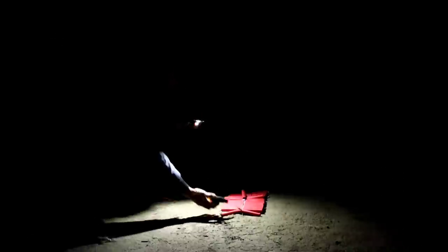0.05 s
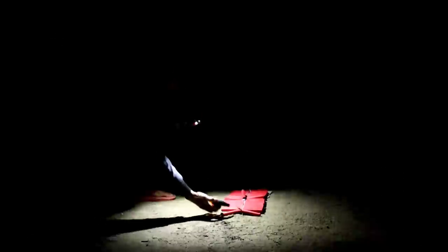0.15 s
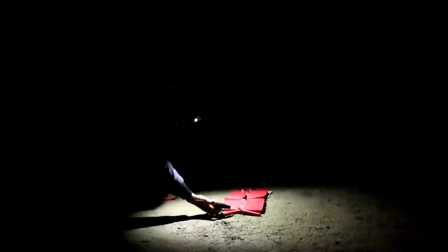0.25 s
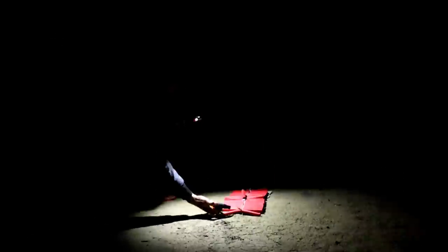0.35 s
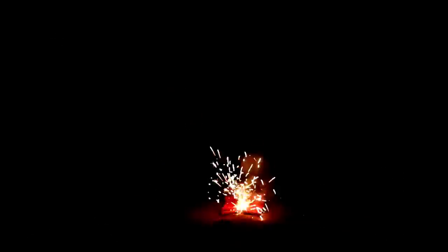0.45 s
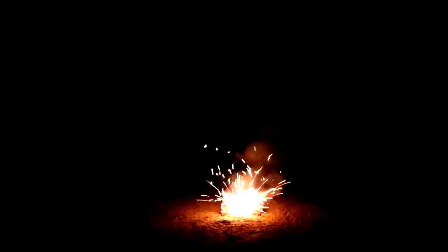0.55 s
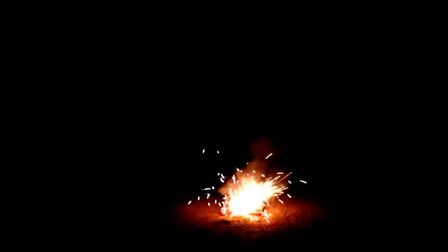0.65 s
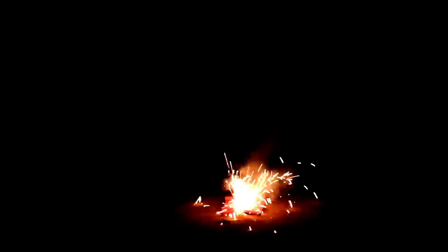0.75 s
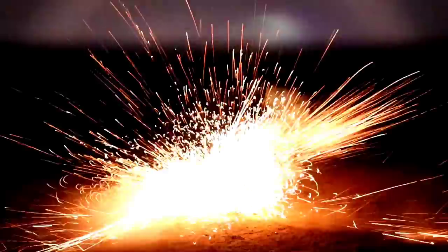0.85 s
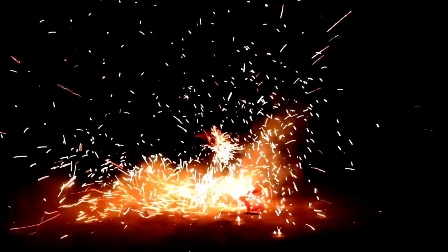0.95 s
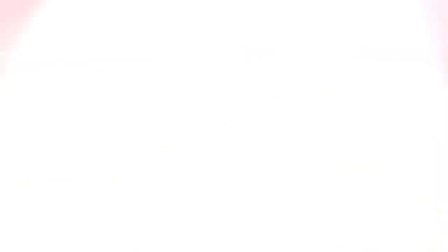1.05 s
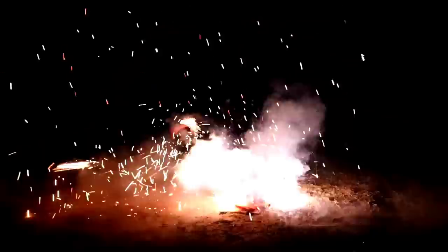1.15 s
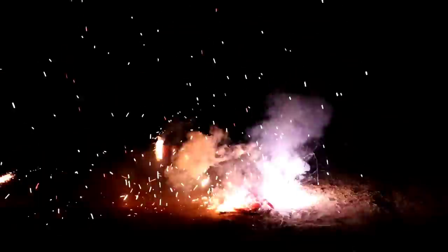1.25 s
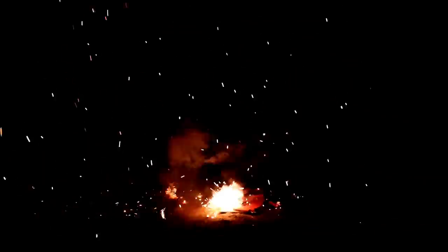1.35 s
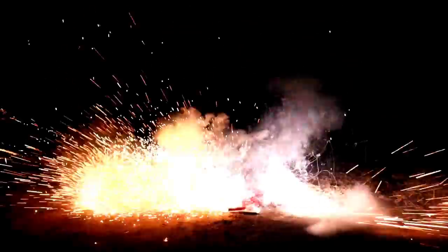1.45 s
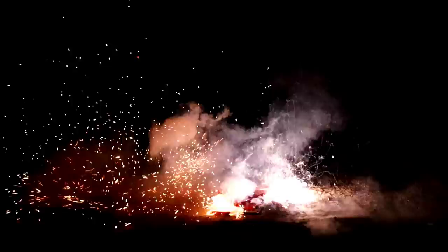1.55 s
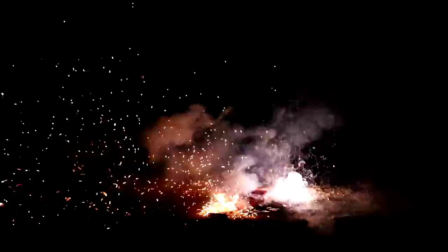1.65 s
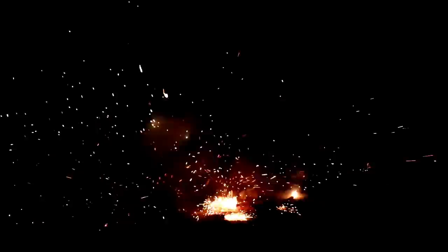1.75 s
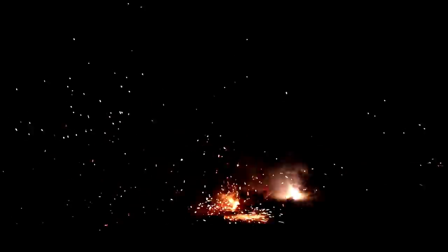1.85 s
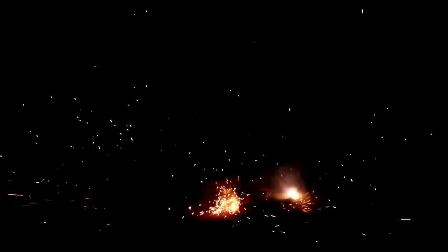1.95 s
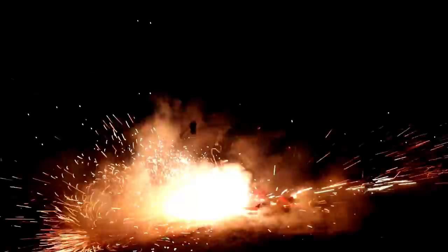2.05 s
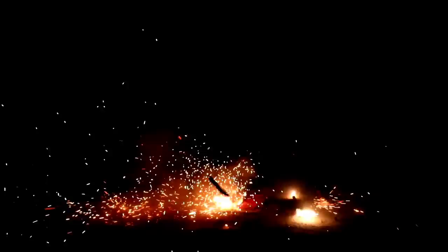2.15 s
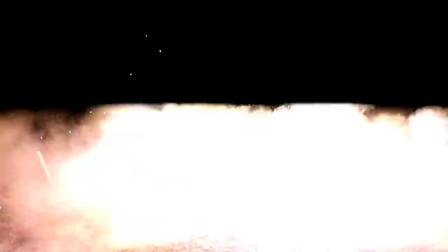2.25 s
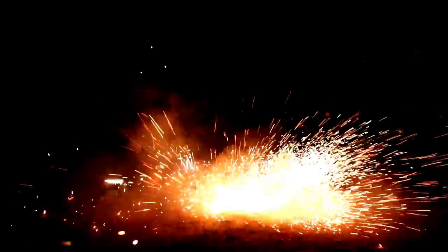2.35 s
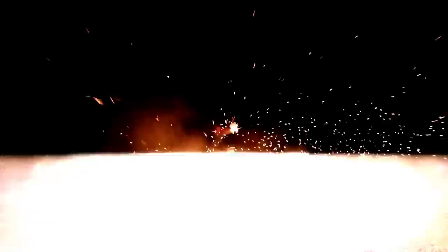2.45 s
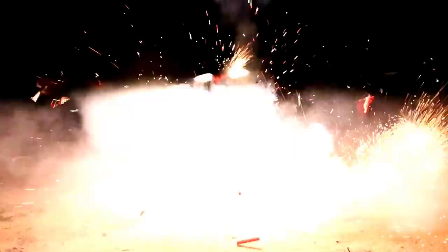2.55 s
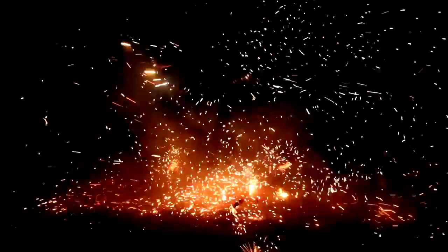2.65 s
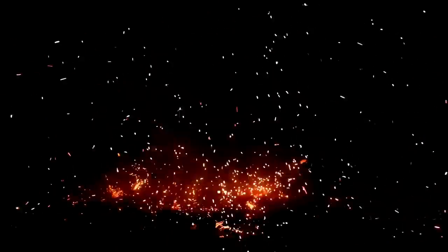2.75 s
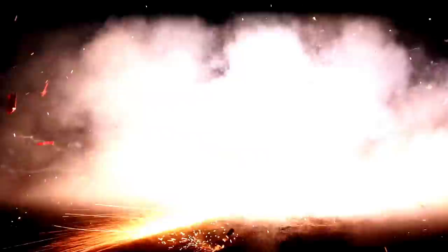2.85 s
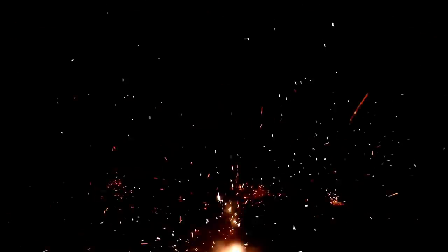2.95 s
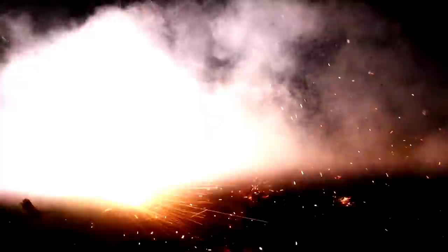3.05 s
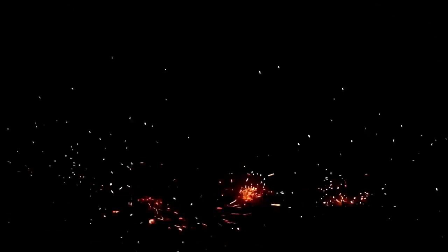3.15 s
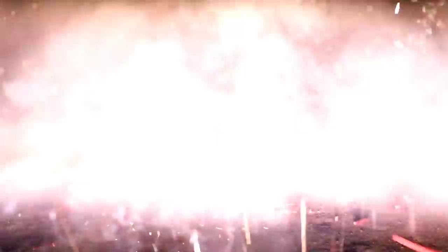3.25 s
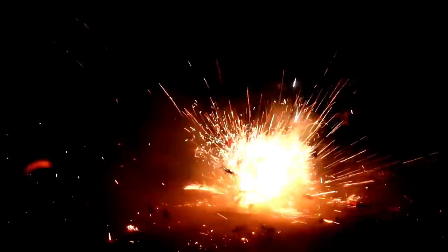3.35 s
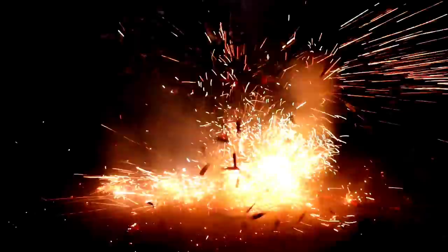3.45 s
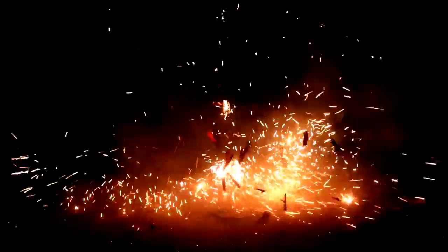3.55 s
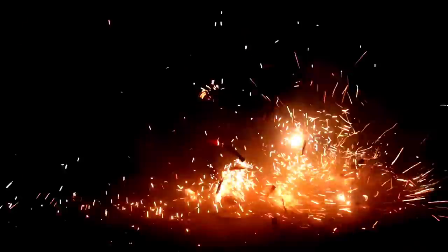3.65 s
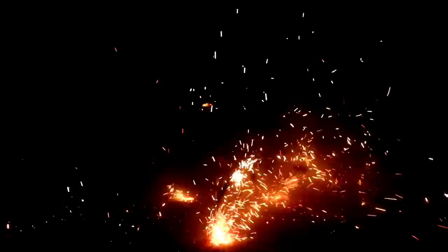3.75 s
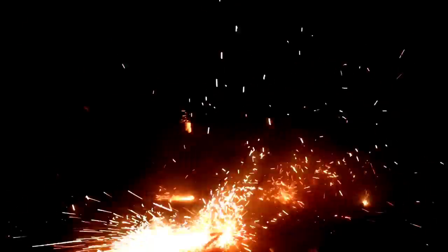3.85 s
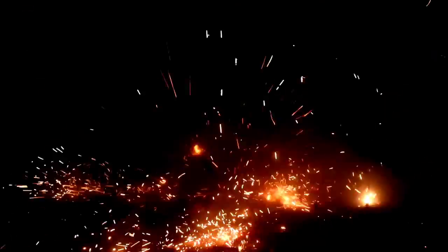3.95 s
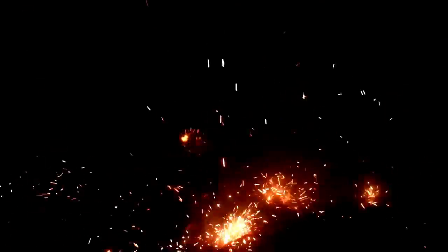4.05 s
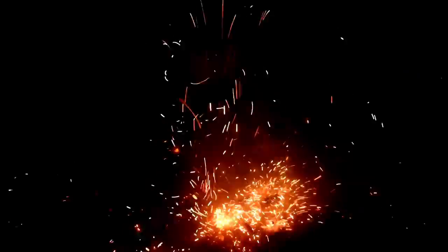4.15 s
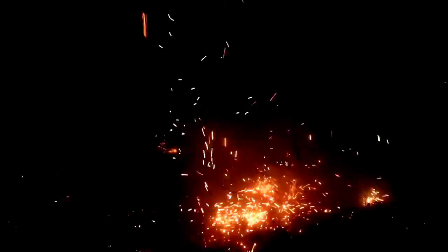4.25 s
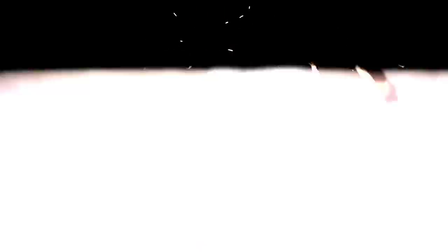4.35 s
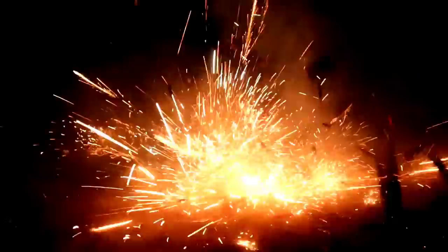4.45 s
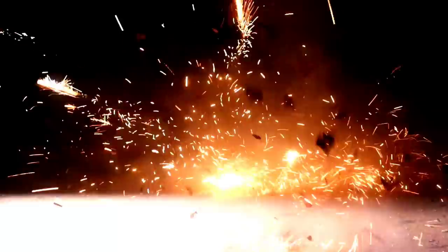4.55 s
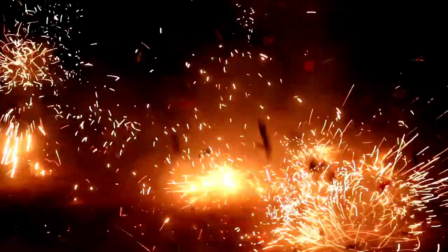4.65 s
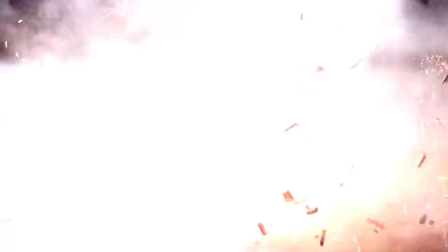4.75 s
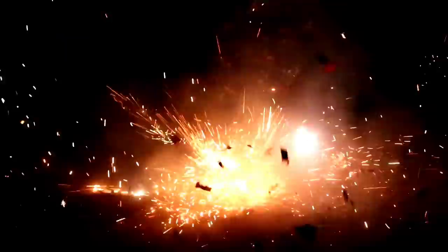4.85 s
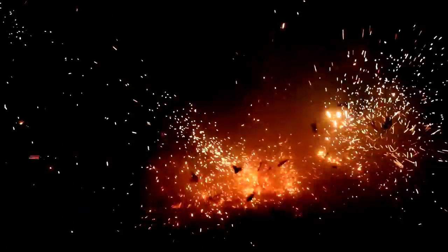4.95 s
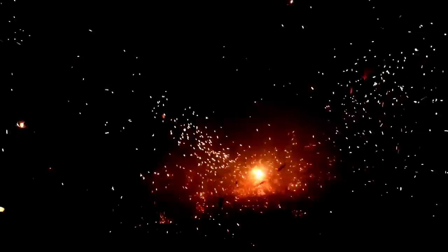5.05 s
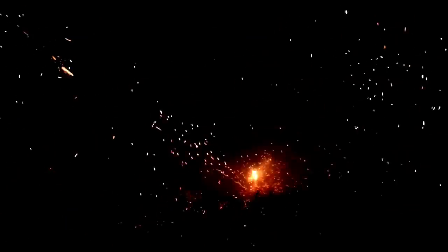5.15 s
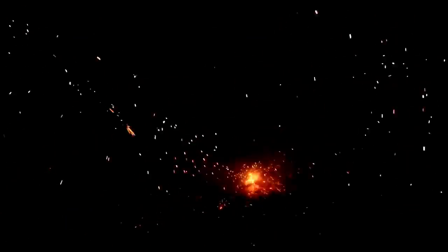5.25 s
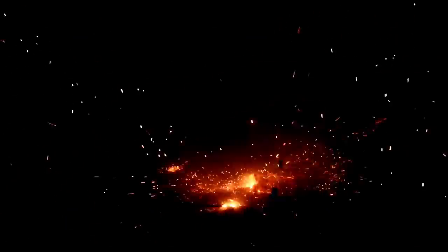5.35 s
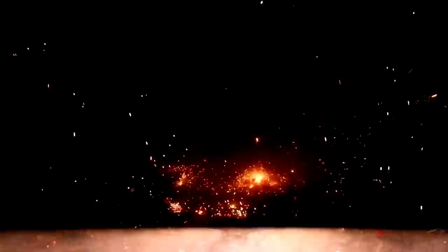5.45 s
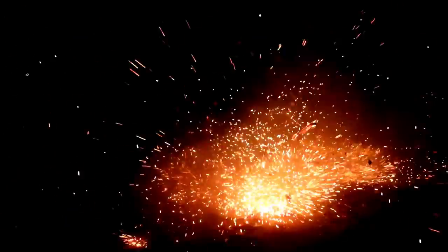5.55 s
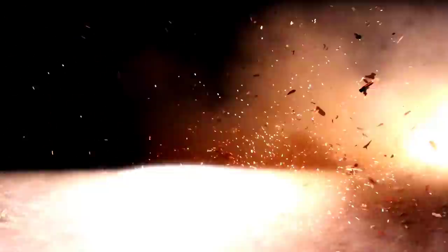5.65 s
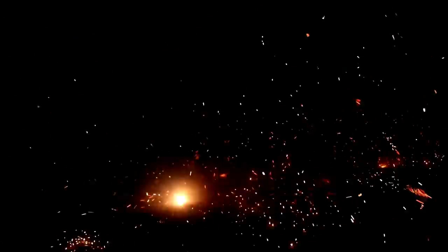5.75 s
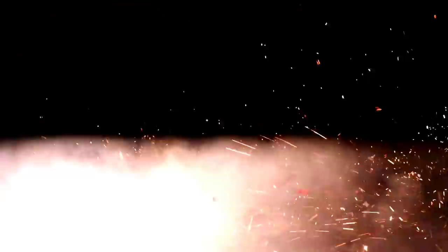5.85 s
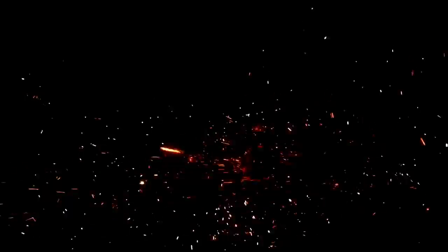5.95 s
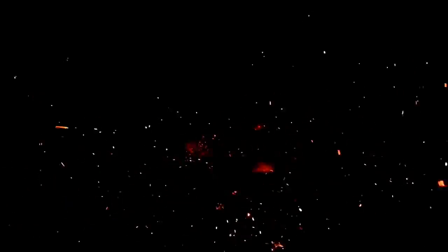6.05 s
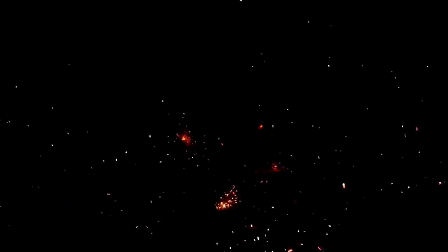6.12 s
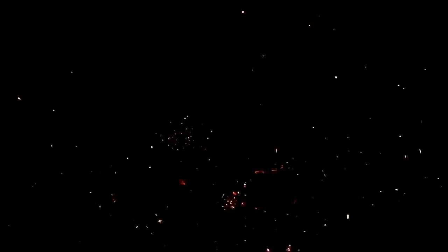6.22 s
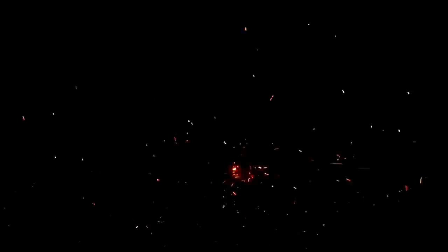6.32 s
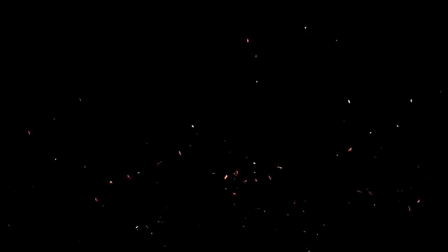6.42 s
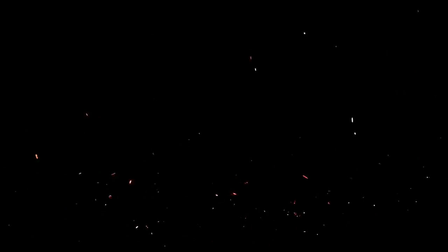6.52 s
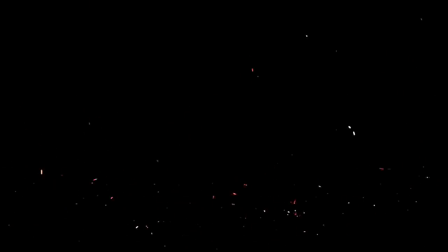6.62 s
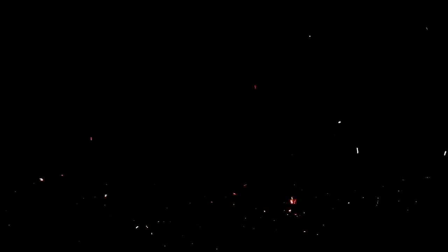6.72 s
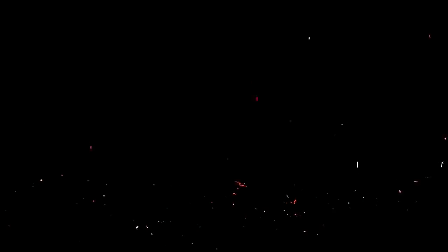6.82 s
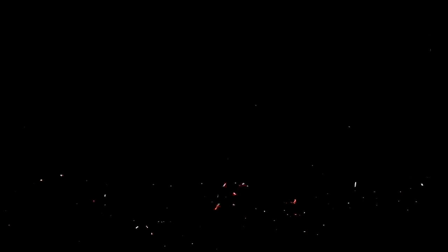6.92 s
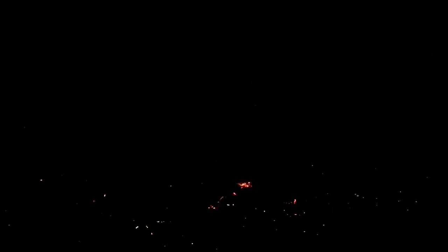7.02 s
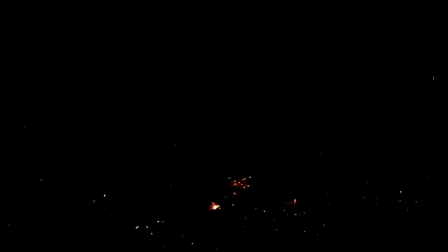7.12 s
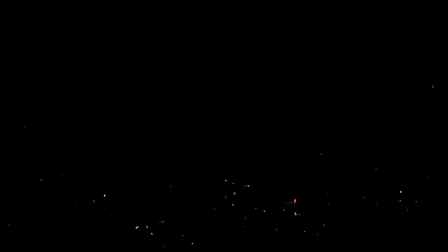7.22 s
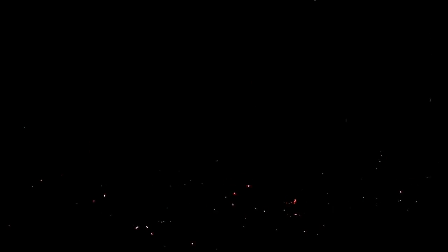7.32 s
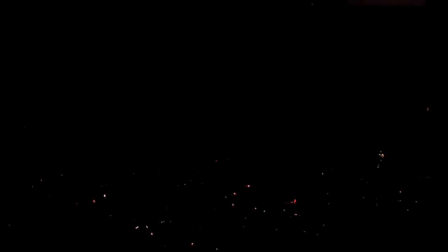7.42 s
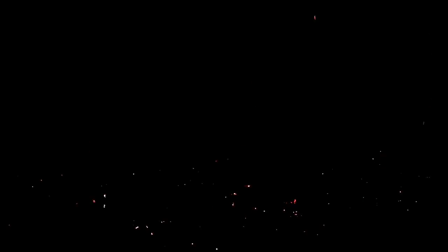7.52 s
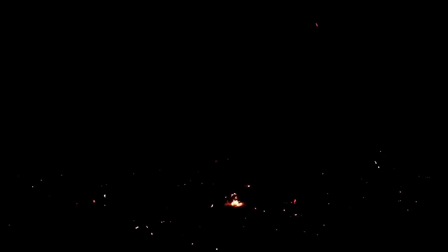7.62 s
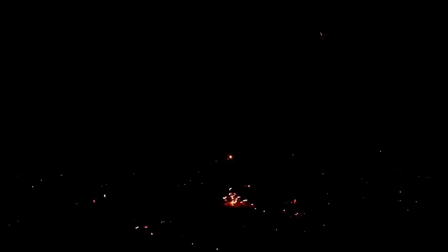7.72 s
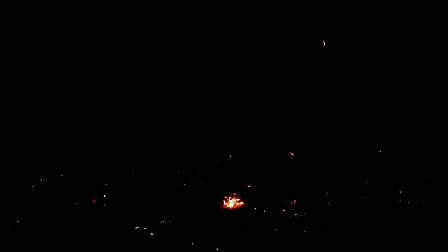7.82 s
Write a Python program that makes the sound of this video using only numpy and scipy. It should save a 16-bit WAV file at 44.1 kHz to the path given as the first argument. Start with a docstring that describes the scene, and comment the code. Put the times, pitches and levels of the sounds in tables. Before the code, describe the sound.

A firecracker string fizzes on open ground at night, then bursts in an uneven run of sharp, overloaded bangs with short slapping echoes.

```python
"""A string of firecrackers burns on open ground a few metres away: the crackers go off in an uneven run of shocks.
A hissing fuse of flickering noise, spurts of filtered noise and ringing paper tubes go with them, over a low night rumble.
Each blast scatters off the ground, slaps back from near and far walls, and returns as swarms of small echoes
from trees and house fronts, most strongly within about a tenth of a second; the first blasts roll back from far off.
The strong blasts overload the microphone, and a limiter turns the sound down briefly around the loudest peaks."""
import sys
import numpy as np
from scipy import signal
from scipy.fft import rfft, irfft
from scipy.io import wavfile
from scipy.ndimage import uniform_filter1d, minimum_filter1d

SR = 44100
rng = np.random.default_rng(int(sys.argv[2]) if len(sys.argv) > 2 else 0)


def wav_record(signal):
    """Record a signal, one row per channel, as 16-bit PCM in the file named by sys.argv[1]."""
    frames = np.transpose(np.atleast_2d(signal))
    bounded = np.clip(frames, -1, 1)
    # unit amplitude maps onto the largest positive 16-bit level
    quanta = np.round(bounded * 32767).astype(np.int16)
    wavfile.write(sys.argv[1], SR, quanta)


N = 347575
TIME = np.arange(N) / SR  # s

# The exploding crackers. Each row: start in seconds, relative blast level in dB, time until the pressure turns
# to suction in ms, relative ground scatter in dB, relative sound sent into the surroundings in dB.
BANGS = [(.9479,45.5,1.14,-39,-10), (.9495,37.5,1.84,-17,-15), (0.9648,44.5,0.83,-26,-4),
         (1.162,2,2,-34,-27), (1.573,38,1.2,-19,-8), (1.7061,20.5,0.39,-14,-16.5), (1.8429,34,1.7,-4,3),
         (2.0366,51.5,1.12,-22,0), (2.0415,5,.3,-47,-15), (2.1779,54.5,1.27,-38,-9.5),
         (2.4089,46,0.92,-21.5,-1), (2.4957,44,0.87,-30,-5.5), (2.612,52.5,0.6,-10,-9.5),
         (2.648,22,0.69,-39,-35), (2.7092,49,0.59,-3,-2.5), (2.727,41,1.29,-54,-5.5),
         (3.0033,42.5,1.49,-44,-6.5), (3.0579,26.5,3.6,-12,-15.5), (3.2035,31.5,1.32,-18.5,-6),
         (3.3974,59.5,0.52,5.5,2.5), (3.4058,3,.35,-13,-28), (3.489,23.5,0.89,-28,-0.5),
         (3.4927,19.5,.45,-38,-13.5), (3.5608,38.5,0.34,6.5,-30), (3.5673,17,0.87,-28,-26),
         (3.5818,5.5,0.38,-9,-8.5), (3.6343,45,1.6,-26,-8), (3.762,40,1.51,-13.5,-1.5),
         (3.965,-10.5,3.3,-39,-23), (4.062,24.5,1.32,-7,-3.5), (4.223,43,0.37,-0.5,-1),
         (4.524,37.5,1.46,1.5,-2), (4.536,24.5,1.5,-46,-7), (4.5476,5,1.1,-46,-31),
         (4.636,36,1.43,-37,-13.5), (4.7341,33,2.05,-44,-10), (4.747,41.5,1.51,-38,-19),
         (4.8597,28,0.8,-33,-15.5), (4.8973,43,1.28,-24,-26), (4.9277,22.5,4.2,-31,-12),
         (4.9519,17,0.56,-21,-5), (5.0547,34,1.34,-67,-20.5), (5.4472,24.5,4.1,-22,-29),
         (5.6165,31.5,1.1,-8,-5.5), (5.6596,22,1.5,-68,-12), (5.809,41.5,2.37,-8,-25),
         (5.815,30,1.16,-37,-9), (5.8323,25,3.3,-56,-24), (5.9422,9,7.5,-49,-25),
         (5.962,34.5,1.86,-9.5,-17), (6.0088,48.5,1.9,-13,-15), (6.0446,26,4,-3.5,-6),
         (6.3843,24,0.64,1.5,-3.5), (7.5285,48.5,.65,-24,0.5), (7.5318,26.5,1.05,-35,-25)]


def undb(db):
    """Decibels are a logarithmic measure: 20 dB is a tenfold amplitude."""
    return 10 ** (np.asarray(db) / 20)


def add(track, start_s, sound):
    """Superposition: pressures add, here from a given start time."""
    i = int(np.clip(round(start_s * SR), 0, N - 1))
    track[i:i + len(sound)] += sound[:N - i]


def unit(x):
    """Normalization: the root-mean-square amplitude becomes 1."""
    return x / np.sqrt(np.mean(x ** 2))


def curve(rows):
    """Piecewise-linear level in dB, from (s, dB) points, as a gain over time."""
    return undb(np.interp(TIME, *np.transpose(rows)))


def butter(x, hz, kind, order=1):
    """Causal filtering with a maximally flat passband."""
    return signal.sosfilt(signal.butter(order, hz, kind, fs=SR, output="sos"), x)


def colour(x, points):
    """Spectral shaping: gains in dB, linear in log frequency between (Hz, dB) points, then rms 1."""
    hz, db = np.transpose(points)
    bins = np.maximum(np.fft.rfftfreq(N, 1 / SR), 1)
    gain = undb(np.interp(np.log(bins), np.log(hz), db))
    return unit(irfft(rfft(x) * gain, N))


def grains(rate, spread_db):
    """Shot noise: random clicks, rate a second, of either sign, with exponentially spread levels in dB."""
    present = rng.random(N) < rate / SR
    sign = rng.choice([-1, 1], N)
    size = undb(spread_db * np.minimum(rng.exponential(size=N), 2 * np.e))
    return unit(present * sign * size)


def night(wind_hz=80, steady_db=-47, swell_db=-28.5, swell_start_s=1.0, swell_rise_s=0.54):
    """Low-frequency noise: an outdoor rumble swells after the first blasts and ebbs slowly, with a light wind."""
    # Rumble spectrum. Each row: frequency in Hz, relative level in dB.
    night_colour = [(30,13), (60,0.5), (110,3.5), (190,-0.5), (300,-4.5), (400,-12.5), (600,-24),
                    (1200,-26.5), (4000,-28.5), (9000,-37), (15000,-57)]
    # Air moving over the microphone. Each row: time in seconds, level in dB.
    wind_level = [(0,-38.5), (.9,-39), (1.6,-31), (4,-61), (7.88,-55)]
    low_noise = butter(rng.standard_normal(N), wind_hz, "low", order=2)
    wind = unit(butter(low_noise, 25, "high"))
    age = np.maximum(TIME - swell_start_s, 0) / swell_rise_s
    swell = undb(swell_db) * 2 * age / (1 + age ** 2)  # crest at age 1
    rumble_level = np.hypot(undb(steady_db), swell)
    return rumble_level * colour(rng.standard_normal(N), night_colour) + curve(wind_level) * wind


def fuse(sparks_gain_db=5, crackle_db=-3, flicker_db=2.6):
    """Modulated noise and shot noise: burning powder hisses unevenly and throws finely crackling sparks."""
    # The fuse flaring up before the first bang. Each row: time in seconds, hiss level in dB.
    flare_level = [(.52,-60), (.66,-34), (.8,-49), (.92,-37.5)]
    # Sparks and smouldering powder. Each row: time in seconds, hiss level in dB before the sparks gain.
    sparks_level = [(0.0, -59), (0.66, -57), (0.79, -48.5), (1.01, -46), (3.38, -46), (3.58, -40.5),
                    (5.02, -56.5), (5.16, -56), (5.66, -53.5), (5.88, -43), (6.91, -63), (7.53, -56),
                    (7.73, -38.5), (7.88, -56)]
    # Hiss spectrum. Each row: frequency in Hz, relative level in dB.
    hiss_colour = [(200, 15.5), (600, 0), (1400, 1), (2500, -1.5), (5000, -5.5), (10000, -10.5),
                   (15000, -21.5)]
    flicker = undb(flicker_db * unit(butter(rng.standard_normal(N), 19, "low", order=2)))
    hiss = flicker * rng.standard_normal(N)
    crackle = undb(crackle_db) * unit(butter(grains(rate=310, spread_db=3.0), 6000, "low"))
    flare = curve(flare_level) * (TIME < BANGS[0][0])
    burn = np.hypot(flare, undb(sparks_gain_db) * curve(sparks_level))  # powers add
    return burn * colour(hiss + crackle, hiss_colour)


def spurts(rise_share=0.21, spread=1.86, gain_db=3.5):
    """Jet noise: powder flares without a bang as band-limited bursts; the longer ones also start more slowly."""
    # Each row: start in seconds, level in dB before the common gain, decay in ms, centre frequency in Hz.
    flares = [(0.224,-43,64,5750), (0.261,-37.5,8.2,7000), (0.351,-35.5,5.7,2240), (.403,-32.5,0.95,1650),
              (.446,-25,1.25,1450), (.705,-23,8.2,460), (.712,-40,2.9,1900), (0.729,-33,4.6,1760),
              (0.774,-33.5,2.7,1020), (.869,-32,16.5,1290), (1.557,-17.5,17,1510), (1.569,-14,12,1420),
              (2.033,-6,2.8,1940), (2.639,-12,1.75,1570), (3.056,-3,4.5,880), (3.128,-6,0.56,3900),
              (3.138,-10,3.8,3600), (3.962,-19.5,2.6,940), (5.145,-18,3.4,530), (5.443,-16,9.1,1930),
              (7.274,-31,1.25,930), (7.874,-32,1.1,9600)]
    out, count = np.zeros(N), SR // 4
    ms = TIME[:count] * 1000
    for start_s, db, decay_ms, hz in flares:
        jet = unit(butter(rng.standard_normal(count), [hz / spread, hz * spread], "band"))
        rise = 1 - np.exp(-ms / (rise_share * decay_ms))
        add(out, start_s, undb(db + gain_db) * jet * rise * np.exp(-ms / decay_ms))
    return out


def tubes():
    """Damped resonance: paper tubes ring briefly as gas escapes, each a decaying sine."""
    # Each row: start in seconds, level in dB, pitch in Hz, decay in seconds.
    rings = [(0.7318,-13.5,1420,0.0023), (3.139,-26,4790,0.011)]
    out, t = np.zeros(N), TIME[:SR // 6]
    for start_s, db, hz, decay_s in rings:
        add(out, start_s, undb(db) * np.sin(2 * np.pi * hz * t) * np.exp(-t / decay_s))
    return out


def shock(t, length, steepness=0.892):
    """Blast wave: a sudden jump of pressure falls into a weak suction; t and length share one unit."""
    return (1 - t / length) * np.exp(-steepness * t / length)


def blasts(gas_db=-3, gas_per_scatter=0.085, gas_hz=2400, gas_ms=0.94, scatter_ms=8.74, pebble_ms=0.3,
           steepness=1.085):
    """Shock, turbulence and scattering: gas tears each shock, and the ground scatters it into small shocks."""
    out, t = np.zeros(N), TIME[:SR // 25]
    ms = t * 1000
    gas = unit(butter(rng.standard_normal(N), gas_hz, "low", order=2))
    hits = np.abs(grains(rate=900, spread_db=-1.0))
    ground = unit(signal.fftconvolve(hits, shock(ms, pebble_ms, steepness=0.89))[:N])
    for start_s, db, push_ms, ground_db, _ in BANGS:
        first = int(start_s * SR)
        span = slice(first, first + len(t))
        # the more a blast scatters, the more it is torn
        torn = undb(gas_db + gas_per_scatter * ground_db) * gas[span] * np.exp(-ms / gas_ms)
        scatter = undb(ground_db) * ground[span] * np.exp(1 - (ms / scatter_ms) ** 2)
        add(out, start_s, undb(db) * (shock(ms, push_ms, steepness) + torn) + scatter)
    return out


def reflection(hz, damping=4.2):
    """Wall reflection: a blast returns as a rounded, damped swing of pressure."""
    turns = hz * TIME[:SR // 50]
    return np.sin(2 * np.pi * turns) * np.exp(-damping * turns)


def slaps(near_hz=800, near_db=8, near_growth=1.45, near_edge_hz=4000, far_edge_hz=900, far_wander_s=0.00093):
    """Discrete echoes: a sharp one from the nearest wall, mainly after strong bangs, and dull ones from afar."""
    # Nearest wall; the delay grows as the microphone moves away. Each row: time in seconds, delay in seconds.
    near_delay = [(.96,0.017), (1.57,0.021), (1.84,0.025), (2.41,.028), (3.4,0.038), (4.1,.039),
                  (7.5,.0485)]
    # Far walls, one thud each. Each row: delay in seconds, relative level in dB, swing frequency in Hz.
    far_walls = [(.066,-9,396), (.096,-7.5,730), (.187,-16.5,320), (.255,-17.5,386)]
    near, far = np.zeros(N), np.zeros(N)
    places = rng.uniform(-1.034, 1, len(BANGS))
    for (start_s, *_, sent_db), place in zip(BANGS, places):
        near_s = start_s + np.interp(start_s, *np.transpose(near_delay))
        add(near, near_s, undb(near_growth * sent_db + near_db) * reflection(near_hz))
        for delay_s, db, hz in far_walls:
            far_s = start_s + delay_s + far_wander_s * place
            add(far, far_s, undb(sent_db + db) * reflection(hz, damping=1.07))
    return butter(near, near_edge_hz, "low") + butter(far, far_edge_hz, "low", order=2)


def echo_power(axis, tail_rise_s=0.03):
    """Energy response after one bang (axis 0 dull, 1 bright): humps over a tail that builds up and dies away."""
    # Trees and house fronts. Each row: delay in seconds, spread in seconds, relative dull and bright levels in dB.
    clusters = [(0.025,0.008,-42,-29), (0.046,0.008,-23,-24), (0.065,0.0043,-15.5,-30.5),
                (.080,0.0034,-25.5,-18), (.097,0.0083,-21.5,-18), (.17,.025,-44,-63),
                (0.234,0.0077,-37,-34.5)]
    # Diffuse tail, dull then bright. Each row: relative level in dB, decay in seconds.
    tails = [(-30,0.15), (-38,0.19)]
    t = TIME[:SR + SR // 5]
    tail_db, decay_s = tails[axis]
    tail = undb(tail_db) * (1 - np.exp(-t / tail_rise_s)) * np.exp(-t / decay_s)
    power = tail ** 2
    for delay_s, spread_s, *db in clusters:
        power = power + undb(db[axis]) ** 2 * np.exp(-((t - delay_s) / spread_s) ** 2)
    return power


def surroundings(boom=0.16):
    """Incoherent scattering: swarms of dull echoes from all around, bright ones from nearby trees or house fronts."""
    # Spectra of the two swarms. Each row: frequency in Hz, relative level in dB.
    dull_colour = [(50, -49), (130, -5), (250, 5.5), (380, 5), (600, 0.5), (900, -21), (1500, -20),
                   (4000, -66)]
    bright_colour = [(150, -14), (500, 4.5), (800, 11), (1100, 7), (1500, 1.5), (2500, -1), (5000, -8),
                     (10000, -15), (15000, -30.5)]
    power = np.zeros((2, N))
    for start_s, _, push_ms, _, sent_db in BANGS:
        # a longer push sends more bass into the distance
        power[:, int(start_s * SR)] += undb(sent_db) ** 2 * np.array([push_ms ** boom, 1])
    # the echoes of different bangs add in power
    dull, bright = (np.sqrt(np.abs(signal.fftconvolve(p, echo_power(k))[:N])) for k, p in enumerate(power))
    dull_swarm = dull * colour(grains(rate=12000, spread_db=2.3), dull_colour)
    bright_swarm = bright * colour(grains(rate=8000, spread_db=2.0), bright_colour)
    return dull_swarm + bright_swarm


def rolls():
    """Distant reverberation: the first blasts roll back from far off as dull swarms that swell and fade."""
    # Each row: time of the crest in seconds, level in dB, half length in seconds.
    crests = [(1.104,-25,0.062), (1.193,-21,0.029), (1.46,-35.5,0.068)]
    # Spectrum. Each row: frequency in Hz, relative level in dB.
    roll_colour = [(60,-13), (150,1), (260,2.5), (480,-6.5), (750,-20), (3000,-39)]
    swell = sum(undb(db) * np.exp(-((TIME - s) / half_s) ** 2 / 2) for s, db, half_s in crests)
    return swell * colour(grains(rate=1500, spread_db=3.0), roll_colour)


def scene():
    """Superposition: the pressures of all sources add at the microphone."""
    other_sources = night() + fuse() + spurts() + tubes()
    return (other_sources + blasts() + slaps() + surroundings() + rolls())[None]


def limiter(x, ceiling=1.202, release_s=0.05):
    """Gain control: turns down just ahead of each peak above the ceiling and recovers exponentially."""
    excess = np.log(np.maximum(np.abs(x) / ceiling, 1))
    # a running maximum against a rising ramp holds each excess while it decays
    ramp = TIME / release_s
    held = np.exp(np.maximum.accumulate(np.log(excess + 1e-12) + ramp) - ramp)
    early = minimum_filter1d(np.exp(-held), size=SR // 2000)
    return x * uniform_filter1d(early, size=SR // 2000)


def record(dry, overload=4.81, coupling_hz=100, rumble_hz=35, shelf_hz=240, shelf_share=0.43, treble_hz=7000,
           treble_lift=0.93, body_lift=0.45, body_hz=(220, 1200), boom_lift=0.33, boom_hz=(130, 260), top_hz=15500):
    """Saturation and filtering: the microphone clips and colours the sound; limiting and clipping hold the peaks."""
    x = -np.clip(dry[0], -overload, overload)  # reversed polarity
    treble = treble_lift * butter(x, treble_hz, "high")
    body = body_lift * butter(x, body_hz, "band")
    boom = boom_lift * butter(x, boom_hz, "band")
    x = x + treble + body + boom
    # two bass cuts make the wave swing back after each blast
    x = butter(butter(x, coupling_hz, "high"), rumble_hz, "high")
    # a zero-phase bass shelf, filtered forwards and backwards, spreads the swing to both sides of the shock
    forward = butter(x, shelf_hz, "low")
    bass = butter(forward[::-1], shelf_hz, "low")[::-1]
    x = np.clip(limiter(x - shelf_share * bass), -1, 1)
    # steep top edge: 0.2 dB ripple, 80 dB rejection
    return signal.sosfilt(signal.ellip(10, .2, 80, top_hz, fs=SR, output="sos"), x)[None]


dry = scene()
out = record(dry)
wav_record(out)
```